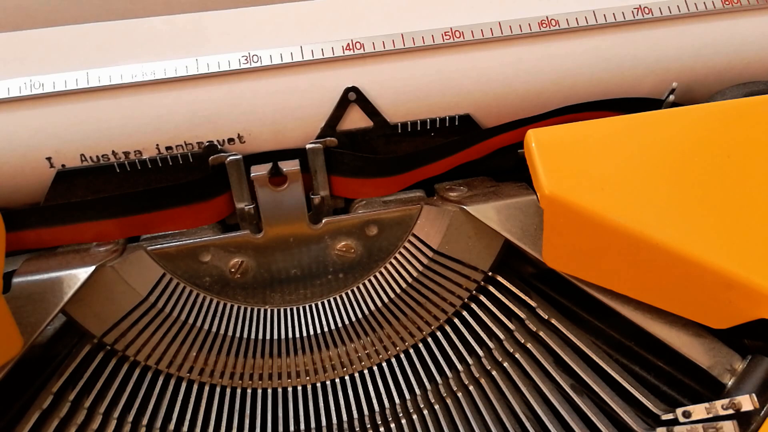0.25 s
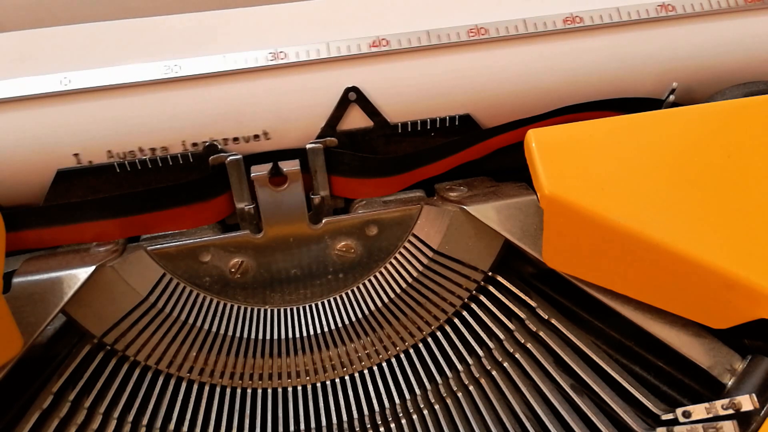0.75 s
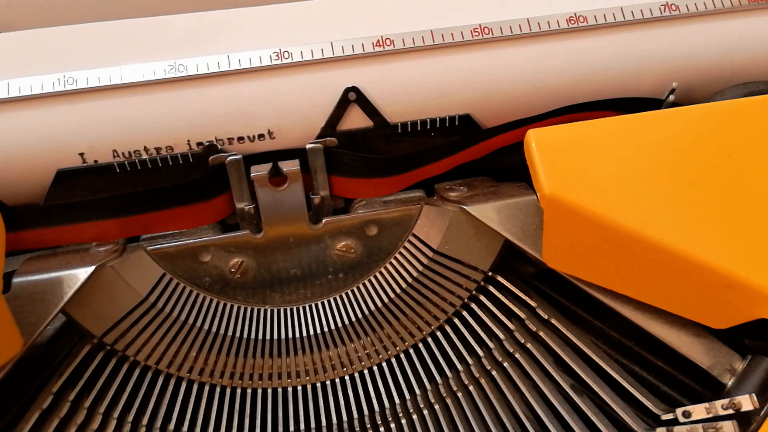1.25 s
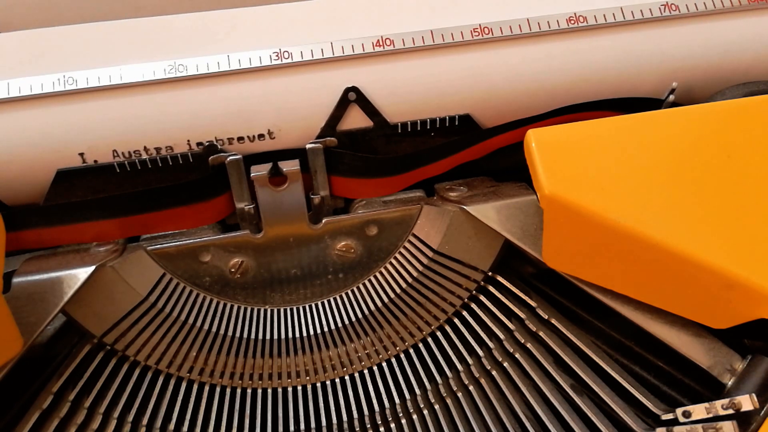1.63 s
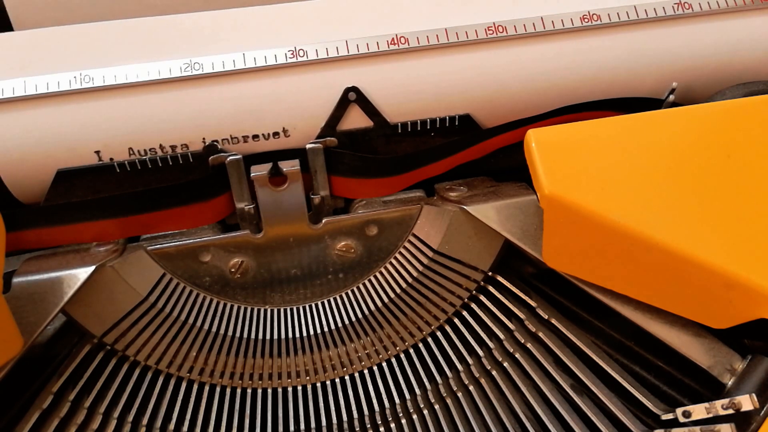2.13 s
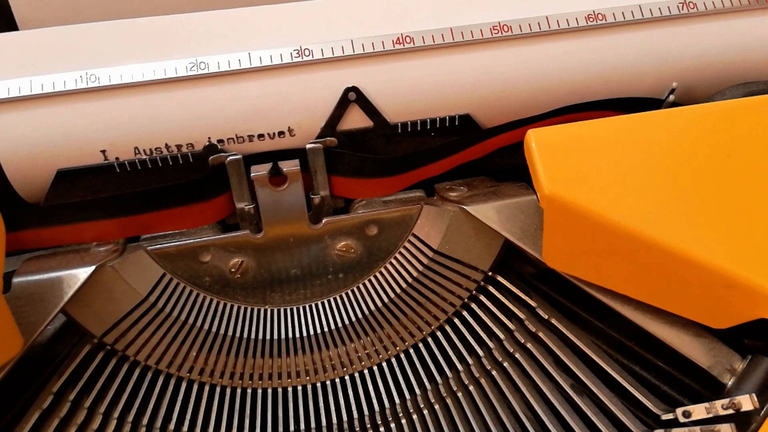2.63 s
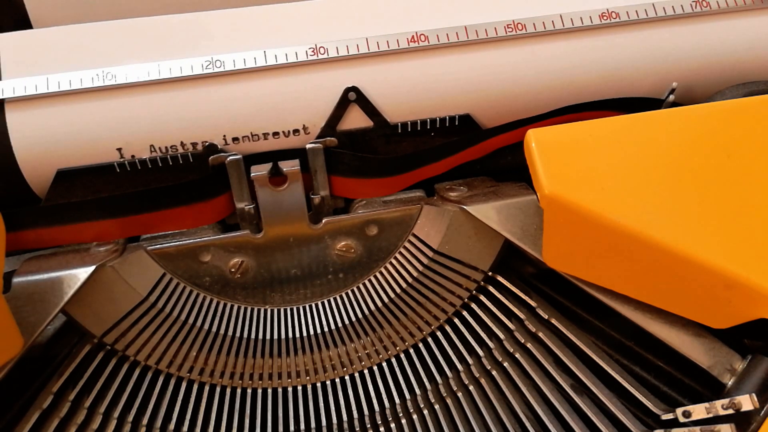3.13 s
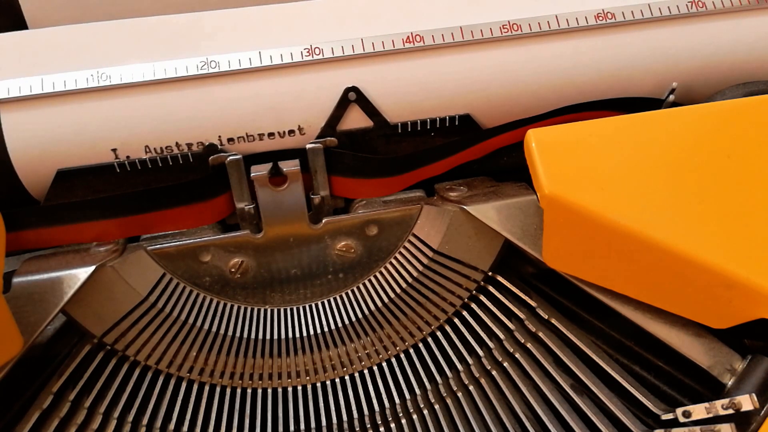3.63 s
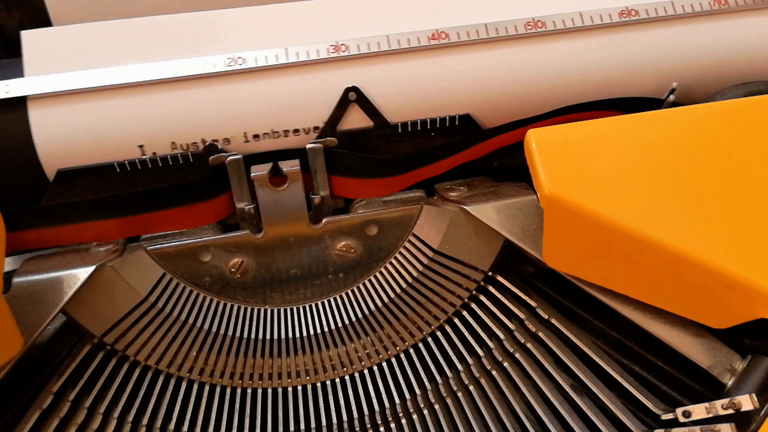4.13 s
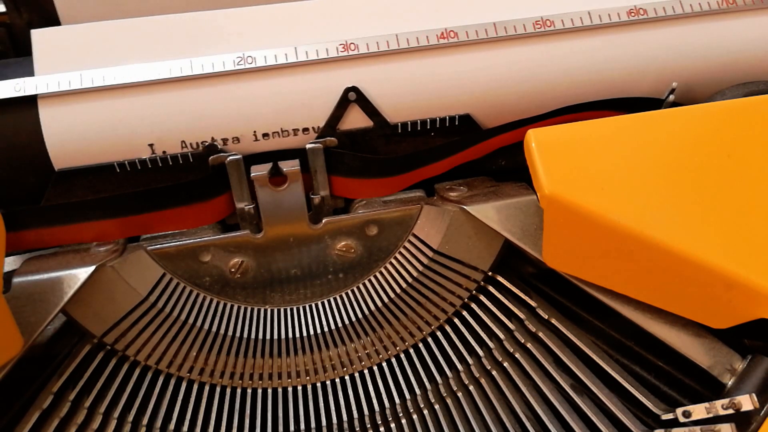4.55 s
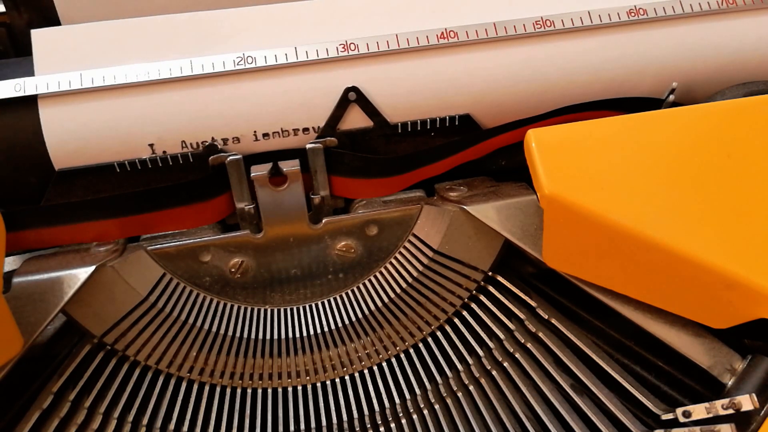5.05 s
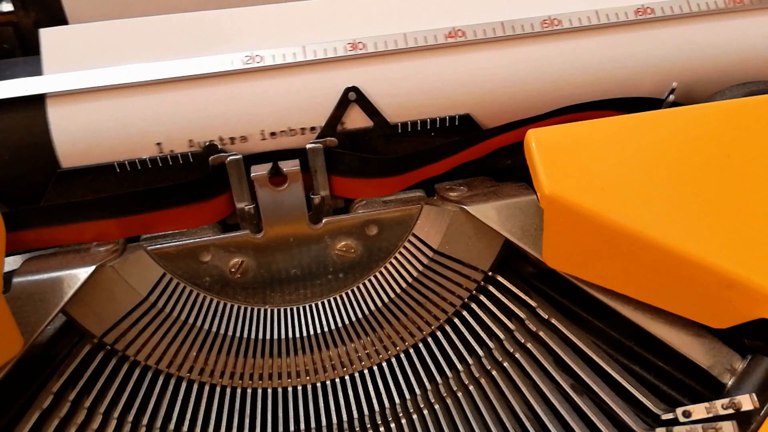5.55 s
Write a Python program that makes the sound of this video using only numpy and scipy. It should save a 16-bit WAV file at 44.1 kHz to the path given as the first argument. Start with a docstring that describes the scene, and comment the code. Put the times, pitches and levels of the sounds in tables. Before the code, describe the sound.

Close stereo microphones catch steel typewriter parts working in a small room. Steady key presses, roughly three a second, start soft and build into bright, heavy clacks. Each has a short gritty slide before it and loose rattling, ticking and a returning lever after it. Later the rhythm turns irregular and denser with carriage catches, over faint hiss and a quiet desk thud.

```python
"""Manual typewriter on a desk

A portable manual typewriter, heard in stereo from just above the type basket in a small room.
One key is worked over and over and steps the carriage back: the linkage scrapes, a heavy clack follows,
then lighter ticks as pawl and key return. Filtered noise gives each contact a crack, rattle and wash;
decaying sines give the steel and desk modes; sparse random impacts give the scrapes and loose chatter."""
import sys
import numpy as np
from scipy import signal
from scipy.fft import rfft, irfft
from scipy.io import wavfile

SR = 44100
rng = np.random.default_rng(int(sys.argv[2]) if len(sys.argv) > 2 else 0)


def wav_record(signal):
    """Record a signal, one row per channel, as 16-bit PCM in the file named by sys.argv[1]."""
    frames = np.transpose(np.atleast_2d(signal))
    bounded = np.clip(frames, -1, 1)
    # unit amplitude maps onto the largest positive 16-bit level
    quanta = np.round(bounded * 32767).astype(np.int16)
    wavfile.write(sys.argv[1], SR, quanta)


N = 254898  # samples, 5.78 s

# Presses: the key goes down with a scrape, a clack that bounces once, a dull carriage rebound and a pawl tick.
# Each row: clack time in seconds, its relative level in dB, its brightness in dB, scrape length in seconds,
# bounce level in dB, rebound delay after the clack in seconds, rebound level in dB,
# pawl delay after the clack in seconds, pawl level in dB.
PRESS_EVENTS = [(0.3412, -47, 4, 0.049, -55, 0.02, -61.5, 0.079, -67),
                (0.693, -43, 7, 0.035, -55, 0.025, -51, 0.069, -58),
                (1.033, -42.5, 6.5, 0.028, -48.5, 0.027, -51, 0.076, -59),
                (1.358, -45, 6, 0.011, -53, 0.022, -79, .068, -58),
                (1.695, -32.5, 5.5, 0.025, -47, 0.035, -42, 0.076, -49),
                (2.025, -41, 3, 0.0012, -54, 0.011, -55.5, 0.087, -64),
                (2.3611, -31, 3.5, 0.03, -44, 0.025, -45, 0.064, -49.5),
                (2.8318, -37.5, 8, 0.01, -38, .027, -48.5, 0.063, -51.5),
                (3.3784, -40.5, 4.5, 0.006, -52, 0.024, -67, .087, -56),
                (3.7593, -35, 4.5, 0.06, -52, 0.023, -52.5, 0.066, -52.5),
                (3.887, -36.5, 4.5, 0.0092, -37.5, 0.032, -48, .074, -52.5),
                (4.101, -34, 7.5, 0.034, -37.5, .022, -42, 0.073, -51.5),
                (4.4918, -33, 4, 0.041, -42.5, .022, -46, 0.063, -50),
                (4.955, -38, 6.5, 0.0067, -44, .025, -66, 0.083, -48),
                (5.3913, -28, 3, 0.024, -35.5, 0.027, -37, 0.087, -43)]
# Catches: the carriage slides and is caught by a tooth of its rack.
# Each row: catch time in seconds, relative level in dB, brightness in dB, length of the slide before it
# in seconds, slide level in dB before the gain shared by all scrapes.
CATCH_EVENTS = [(0.0906, -58.5, 2, 0.029, -71.5), (1.292, -52.5, 6, 0.023, -56.5),
                (2.6140, -44, 7, 0.01, -56), (3.0717, -37.5, 4.5, 0.013, -43),
                (3.3062, -44.5, 4, 0.024, -45.5), (3.6379, -36, 9.5, 0.021, -41),
                (4.873, -47.5, 6, 0.029, -43), (5.2814, -39.5, 4.5, 0.033, -40.5),
                (5.754, -38.5, 0.5, .028, -44)]
# Stereo image at the two microphones.
# Each row: frequency in Hz, left-over-right level in dB, likeness of the sides from -1 to 1.
STEREO_IMAGE = [(60, 0, .98), (150, 0, .92), (300, 1, .1), (550, 4.5, -.1), (1150, 3, .35), (2700, 3, .05),
                (6400, 6.5, .05), (8200, 11, .05), (9600, 13, .05), (12000, 2, .1), (14500, -1.5, .1)]

EDGES = np.geomspace(36, 15500, 28)  # band edges, Hz
CENTRES = np.sqrt(EDGES[1:] * EDGES[:-1])
BANDS = [signal.butter(2, edge, "band", fs=SR, output="sos") for edge in zip(EDGES, EDGES[1:])]
AGE = np.arange(int(.7 * SR)) / SR  # time since a contact, s
SIDES = np.array([[1], [-1]])  # left, right


def from_db(db):
    """Level law: an amplitude gain is ten to the power of dB / 20."""
    return 10 ** (np.asarray(db) / 20)


def at_hz(table, hz):
    """Spectral interpolation: the columns of a table are read along a logarithmic frequency axis."""
    points, *columns = np.transpose(table)
    return np.squeeze([np.interp(np.log(hz), np.log(points), c) for c in columns])


def decay(t60):
    """Exponential damping: the amplitude falls by 60 dB in t60 seconds."""
    return np.exp(-np.log(1000) * AGE / t60)


def band_gains(spectrum):
    """Power summation: density times bandwidth gives each band's power, and the powers sum to one."""
    gain = from_db(at_hz(spectrum, CENTRES)) * np.sqrt(np.diff(EDGES))
    return gain / np.linalg.norm(gain)


def pan(left_db):
    """Constant-power panning: a level difference divides the power between the two sides."""
    gain = from_db(SIDES * left_db / 2)
    return gain / np.sqrt(np.mean(gain ** 2))


def background(hiss_db=-88.5, whine_db=-91.5, whine_hz=12000):
    """Stationary noise and a pure tone: faint shaped hiss with a thin electronic whine, at RMS levels."""
    # Each row: frequency in Hz, relative hiss density in dB per Hz.
    hiss_spectrum = [(30, 11), (90, 11), (300, 0.5), (1000, 1), (14000, -1)]
    hz = np.maximum(np.fft.rfftfreq(N, 1 / SR), 1)
    white = rng.standard_normal((2, N))
    hiss = irfft(rfft(white) * from_db(at_hz(hiss_spectrum, hz)), N)
    whine = np.sqrt(2) * np.sin(2 * np.pi * whine_hz * np.arange(N) / SR)
    return from_db(hiss_db) * hiss / hiss.std() + from_db(whine_db) * whine


def contacts(bounce_s=.006):
    """Impact sequence: rows of time in s, then level, thud, knock and brightness in dB, for every contact."""
    # Releases: the lever thumps back, the latch snaps in and settles.
    # Each row: thump time in seconds, level in dB, snap delay after the thump in seconds, snap level in dB,
    # settling delay after the thump in seconds, settling level in dB.
    releases = [(0.484, -55, 0.0053, -49, 0.025, -63), (0.84, -55.5, 0.012, -55.5, 0.035, -60),
                (1.1866, -53.5, 0.013, -55, .032, -83), (1.5008, -48.5, 0.0075, -49.5, 0.031, -52.5),
                (1.829, -45.5, 0.0046, -40.5, .030, -74), (2.1427, -42, 0.0078, -39.5, .030, -49),
                (2.4975, -46, 0.011, -77, 0.021, -49.5), (3.1773, -42.5, 0.014, -43.5, 0.073, -66),
                (3.5337, -39, .006, -37.5, .035, -38), (4.2441, -46, .012, -40, 0.037, -48),
                (4.6329, -41.5, .011, -42.5, .050, -47.5), (5.0947, -39, 0.0074, -42.5, .029, -41),
                (5.551, -41.5, 0.0093, -42.5, 0.028, -46)]
    # The key lands on its rest. Each row: time in seconds, level in dB, brightness in dB.
    landings = [(0.5776, -55.5, 1), (0.9322, -51, 4), (1.5977, -52, 2.5), (1.943, -48.5, 5),
                (2.2554, -46, -2), (2.7022, -46.5, 6), (2.9256, -42, 1.5), (3.961, -52.5, -5),
                (4.3506, -42.5, 3.5), (5.5028, -50.5, -3), (5.6891, -52, 0)]
    # A finger meets the key. Each row: time in seconds, level in dB.
    touches = [(0.3155, -83), (2.3422, -57), (2.7876, -64), (3.044, -59), (3.4661, -56.5), (4.06, -61.5)]
    # A loose link ticks by itself. Each row: time in seconds, level in dB.
    link_ticks = [(0.274, -81), (3.5527, -40.5), (4.7464, -68), (5.1591, -50), (5.1727, -52.5),
                  (5.618, -50.5)]
    # colour of each kind of contact: thud dB, knock dB
    clack, catch, landing = (-12.5, -3), (-20, -0.71), (-45, 3)
    # and with a fixed brightness dB
    bounce, rebound, pawl = (0.5, -1.2, 0), (-17, 6.9, -3), (-0.78, 0, 3)
    thump, snap, tick, touch = (1, 1.95, 0.67), (-10, -4, 2.04), (-24, -3, 1.5), (13, 8, -8)
    rows = []
    for s, db, bright_db, _, bounce_db, rebound_s, rebound_db, pawl_s, pawl_db in PRESS_EVENTS:
        rows += [(s, db, *clack, bright_db), (s + bounce_s, bounce_db, *bounce),
                 (s + rebound_s, rebound_db, *rebound), (s + pawl_s, pawl_db, *pawl)]
    for s, db, snap_s, snap_db, settle_s, settle_db in releases:
        rows += [(s, db, *thump), (s + snap_s, snap_db, *snap), (s + settle_s, settle_db, *tick)]
    rows += [(s, db, *catch, bright_db) for s, db, bright_db, _, _ in CATCH_EVENTS]
    rows += [(s, db, *landing, bright_db) for s, db, bright_db in landings]
    rows += [(s, db, *touch) for s, db in touches]
    rows += [(s, db, *tick) for s, db in link_ticks]
    return np.array(rows)


def ticks(per_s, uneven_db):
    """Random point process: tiny impacts of uneven size and either sign at a mean rate per second."""
    size = from_db(uneven_db * np.clip(rng.standard_normal(N), -2, 2)) * rng.choice([-1, 1], N)
    return size * (rng.random(N) < per_s / SR)


def scraping(per_s=1200, swell_db=18, level_db=-8, press_db=-15.5, usual_s=0.02):
    """Stick-slip friction: sliding steel slips in quick runs that grow with the load up to the contact."""
    slides = []
    for s, db, _, length, *_ in PRESS_EVENTS:
        # a quicker scrape is louder
        slides.append((s, length, from_db(db + press_db) * np.sqrt(usual_s / length)))
    slides += [(s, length, from_db(db)) for s, _, _, length, db in CATCH_EVENTS]
    t, force = np.arange(N) / SR, np.zeros(N)
    for end, length, load in slides:
        during = (t >= end - length) & (t < end)
        force[during] += load * from_db(level_db - swell_db * (end - t[during]) / length)
    return force * ticks(per_s, uneven_db=3.5)


def flutter(depth_db=1.5, step_s=.007):
    """Energy exchange: the gain wanders as loose parts take up the vibration and give it back."""
    knots = np.arange(0, AGE[-1] + step_s, step_s)
    return from_db(depth_db * np.interp(AGE, knots, rng.standard_normal(len(knots))))


def frame_response(grain, blow_s=0.0073, give_s=0.00044, crack_t60_s=.008, lag_s=.00035, lag_spread=.3):
    """Statistical modal density: noise bands form crack, rattle and wash, with a unit burst's energy."""
    # Crowd of overlapping frame modes. Each row: frequency in Hz, relative density in dB per Hz.
    frame_spectrum = [(35, -4), (55, -3), (110, -4.5), (200, -1.5), (550, 1.5), (800, -0.5), (1150, 7),
                      (1550, -4), (3200, 4), (4200, -1), (5300, 3.5), (7500, -0.5), (9600, 2.5),
                      (12000, -1.5), (14500, -8.5)]
    # Decay of the rattle. Each row: frequency in Hz, t60 in seconds.
    rattle_decay = [(60, 0.38), (300, 0.098), (1100, 0.086), (3000, 0.065), (9000, 0.035), (14000, 0.054)]
    # Height of the first crack. Each row: frequency in Hz, level over the rattle in dB.
    crack_height = [(100, 11.5), (1100, -7), (3000, -5), (9000, 3), (14000, -3)]
    # Lingering wash of springs and room.
    # Each row: frequency in Hz, level relative to the rattle in dB, t60 in seconds.
    wash_decay = [(60, 5, 1), (250, -15.5, 0.71), (1100, -13.5, 0.4), (3570, -18.5, 0.37),
                  (9100, -21.5, 0.27), (14700, -18.5, 0.27)]
    out, rattle = [], flutter()
    # each spot has its own path to the right side
    lag = round(lag_s * SR * (1 + lag_spread * rng.standard_normal()))
    for k, (hz, gain) in enumerate(zip(CENTRES, band_gains(frame_spectrum))):
        crack, mid, side = grain[k % 2]
        left_db, alike = at_hz(STEREO_IMAGE, hz)
        wash_db, wash_t60 = at_hz(wash_decay, hz)
        alike = np.clip(alike, -1, 1)
        body = (np.sqrt(1 + alike) * mid + np.sqrt(1 - alike) * side * SIDES) / np.sqrt(2)
        body = body * np.hypot(decay(at_hz(rattle_decay, hz)), from_db(wash_db) * decay(wash_t60))
        body = body * (1 - np.exp(-AGE / give_s))  # the shock takes a moment to spread through the frame
        body = body * rattle * flutter()
        crack = crack * from_db(at_hz(crack_height, hz)) * decay(crack_t60_s)
        # the crack comes straight through the air and reaches the left side first
        crack = np.array([crack, np.roll(crack, lag)])
        band = signal.sosfilt(BANDS[k], body + crack)
        burst_size = np.sqrt(np.sum(band ** 2, axis=1, keepdims=True) / (blow_s * SR))
        out.append(gain * pan(left_db) * band / burst_size)
    return np.array(out)


def spot_responses(count=8, kinship=0.34):
    """Partial correlation: the responses of a few spots in the machine share part of the frame's grain."""
    shared, *own = rng.standard_normal((count + 1, 2, 3, len(AGE)))
    kinship = np.clip(kinship, 0, 1)
    return [frame_response(np.sqrt(kinship) * shared + np.sqrt(1 - kinship) * grain) for grain in own]


def strengths(hz, thud_hz=350, knock_hz=850, bright_hz=7000):
    """Impact spectrum: weight drives the desk, a firm push the shell and a hard edge the treble."""
    _, level_db, thud_db, knock_db, bright_db = contacts().T[:, :, None]
    thud = 1 / (1 + (hz / thud_hz) ** 4)
    knock = np.exp(-np.log2(hz / knock_hz) ** 4 / 2)
    bright = np.tanh(2 * np.log2(hz / bright_hz)) / 2 * (hz > 2 * knock_hz)  # a tilt about bright_hz
    return from_db(level_db + thud * thud_db + knock * knock_db + bright * bright_db)


def clatter(spots, level_db=1.0, colour_db=2.0):
    """Linear superposition of bands: each contact lands on one spot and colours it a little differently."""
    drive = strengths(CENTRES)
    drive = drive * from_db(level_db + colour_db * rng.standard_normal(drive.shape))
    spot = rng.integers(0, len(spots), len(drive))
    out = np.zeros((len(drive), 2, len(AGE)))
    for k, response in enumerate(spots):
        out[spot == k] = np.tensordot(drive[spot == k], response, 1)
    return out


def ringing(count=8, level_db=0.0, scatter_db=2.2, limit_s=.13, spread=2.14, spread_hz=400, detune=0.0092):
    """Modal synthesis: each contact rings damped sines, their pitch shifted by the linkage's position."""
    # Clear modes of the shell and the steel parts.
    # Each row: frequency in Hz, relative level in dB, longest t60 in seconds before the friction limit.
    clear_modes = [(458, -35, 0.73), (525.5, -25, 0.14), (720, -23.5, 0.21), (885.3, -17.5, 0.29),
                   (913, -25.5, 0.3), (975, -53, 0.3), (1162.6, -10.5, 0.3), (1223.4, -12, 0.3),
                   (1934, -11.5, 0.28), (2684, -22.5, 0.12), (2914, -14.5, 0.12), (3290, -16, 0.08),
                   (3773, -11, 0.25), (5610, -8.5, 0.15), (6650, -10, .035), (7450, -20, 0.089),
                   (8760, -12, 0.07), (9160, -9.5, 0.09), (9830, -5.5, 0.18)]
    hz, mode_db, t60 = np.transpose(clear_modes)
    t60 = np.minimum(t60, limit_s / np.sqrt(hz / 10 ** 3))  # friction in the joints ends high rings soonest
    chance = rng.standard_normal((len(contacts()), 2, len(hz)))
    fickle = hz / (hz + spread_hz)  # short waves depend more on where the blow lands
    drive = strengths(hz) * from_db(level_db + mode_db + scatter_db * fickle * chance[:, 0])
    skew = spread * fickle * chance[:, 1]  # phase between the sides, rad
    drive = drive[:, None] * pan(at_hz(STEREO_IMAGE, hz)[0]) * np.exp(.5j * SIDES * skew[:, None])
    position = rng.integers(0, count, len(drive))  # each contact finds the linkage in a random position
    fade = decay(t60[:, None])
    out = np.zeros((len(drive), 2, len(AGE)))
    for k, shift in enumerate(rng.standard_normal((count, len(hz)))):
        phase = 2 * np.pi * np.outer(hz * (1 + detune * fickle * shift), AGE)
        struck = drive[position == k]
        in_phase = np.tensordot(struck.real, fade * np.sin(phase), 1)
        quadrature = np.tensordot(struck.imag, fade * np.cos(phase), 1)
        out[position == k] = in_phase + quadrature
    return out


def chatter(per_s=260, level_db=-17, settle_t60=0.096):
    """Energy decay: loose typebars and links rebound after each contact, ever more weakly."""
    s, db = contacts().T[:2]
    jolts = np.bincount((s * SR).astype(int), from_db(db + level_db) ** 2, N)[:N]
    loss = from_db(-120 / (settle_t60 * SR))  # per sample, on energy
    shake = signal.lfilter([1], [1, -loss], jolts + 1e-18)
    return np.sqrt(shake) * ticks(per_s, uneven_db=7.0)


def typewriter(wander_db=2.0):
    """Superposition and convolution: contacts add at their moments, and small impacts excite the frame."""
    spots = spot_responses()
    out = np.zeros((2, N + len(AGE)))
    for row, sound in zip(contacts(), clatter(spots) + ringing()):
        start = int(row[0] * SR)
        # each contact comes from a slightly different place
        out[:, start:start + len(AGE)] += sound * pan(wander_db * rng.standard_normal())
    # scraping excites the first spot, chatter the second
    for impacts, response in zip([scraping(), chatter()], spots):
        out[:, :-1] += signal.fftconvolve(impacts[None], response.sum(0), axes=1)
    return out[:, :N]


def desk(follow=0.88, usual_db=-40, scatter_db=0.5, heft=0.22):
    """Impulse-driven resonators: each contact rocks the desk, the more so with weight behind it."""
    # Slow swings of the desk and the springs.
    # Each row: frequency in Hz, level in dB for a contact at usual_db with average thud, t60 in seconds.
    desk_modes = [(49.7, -81.5, 1), (81.8, -88, 0.81), (101, -81.5, 0.64), (203.3, -77, 0.82),
                  (283, -75, 0.38)]
    s, db, thud_db = contacts().T[:3]
    push_db = follow * (db - usual_db) + heft * (thud_db - thud_db.mean())
    out = np.zeros(N)
    for hz, mode_db, t60 in desk_modes:
        push = from_db(mode_db + push_db + scatter_db * rng.standard_normal(len(s)))
        pushes = np.bincount((s * SR).astype(int), push * rng.choice([-1, 1], len(s)), N)[:N]
        r, w = from_db(-60 / (t60 * SR)), 2 * np.pi * hz / SR  # pole radius and angle
        out += signal.lfilter([0, np.sin(w)], [1, -2 * r * np.cos(w), r * r], pushes + 1e-18)
    return out


def scene():
    """Superposition: the typewriter, its desk and the quiet background add together."""
    return typewriter() + desk() + background()


def record(dry):
    """Low-pass filtering: an elliptic filter cuts the top steeply above 14450 Hz."""
    return signal.sosfilt(signal.ellip(10, .2, 70, 14450, fs=SR, output="sos"), dry)


dry = scene()
out = record(dry)
wav_record(out)
```